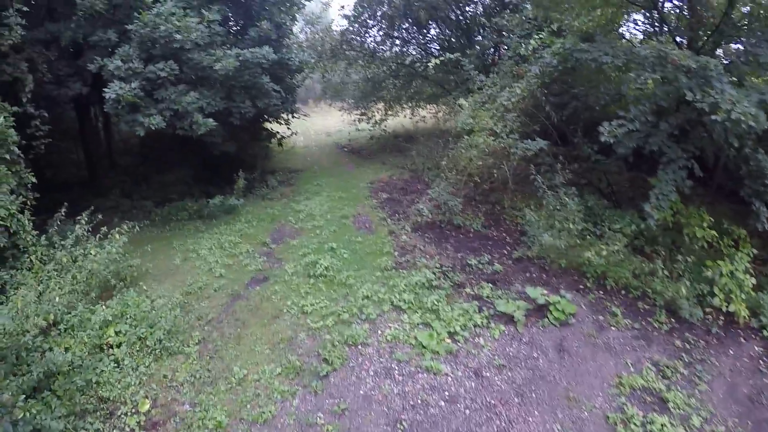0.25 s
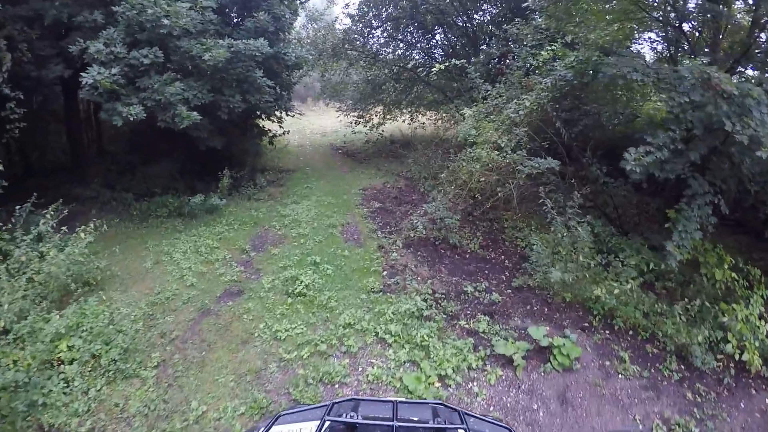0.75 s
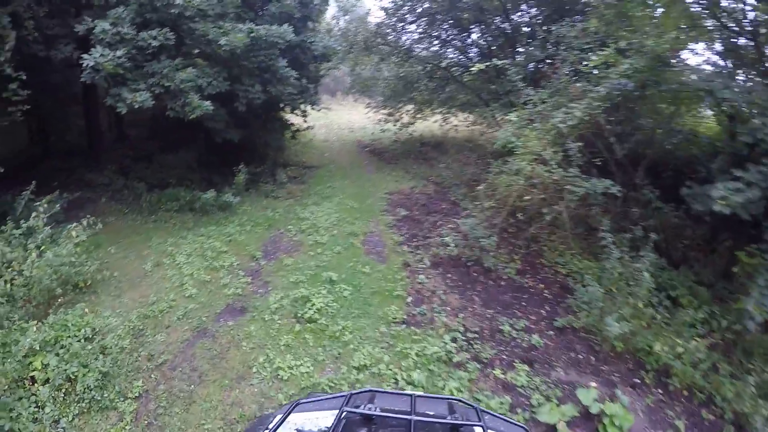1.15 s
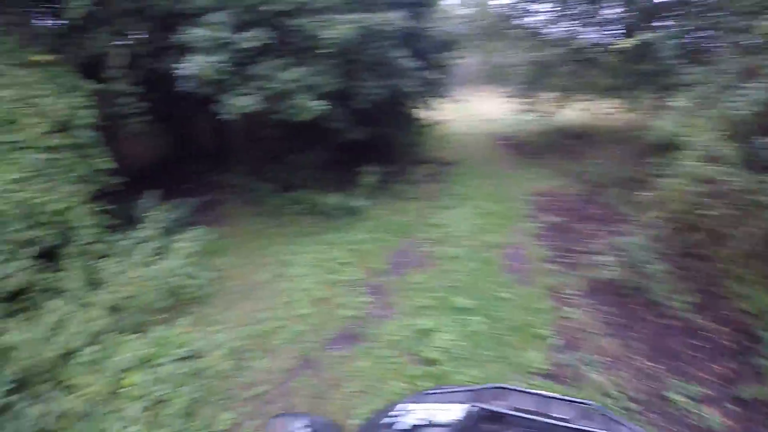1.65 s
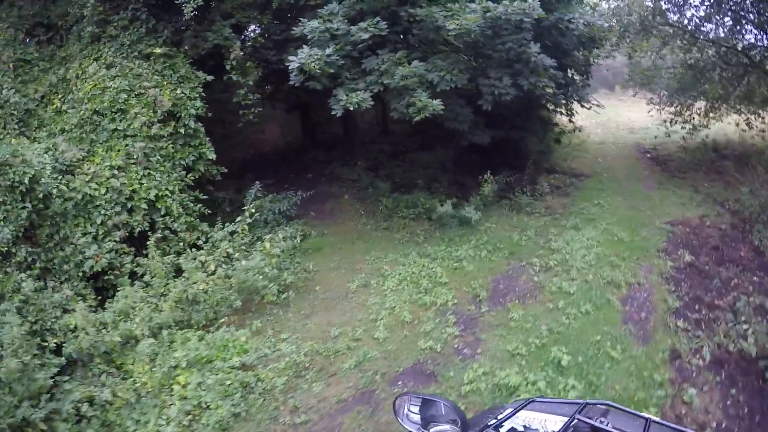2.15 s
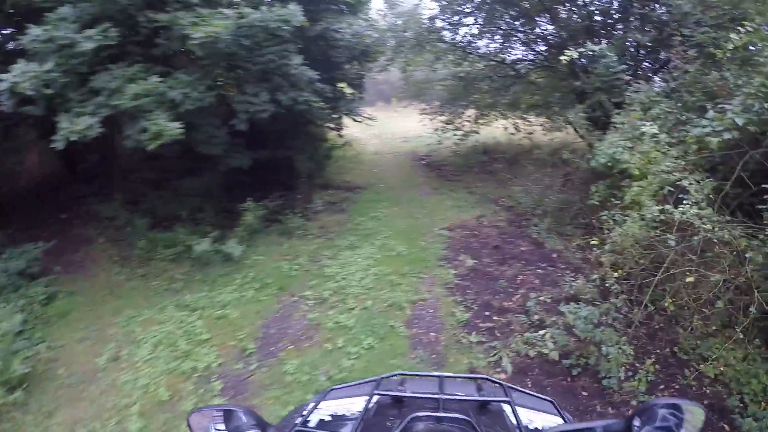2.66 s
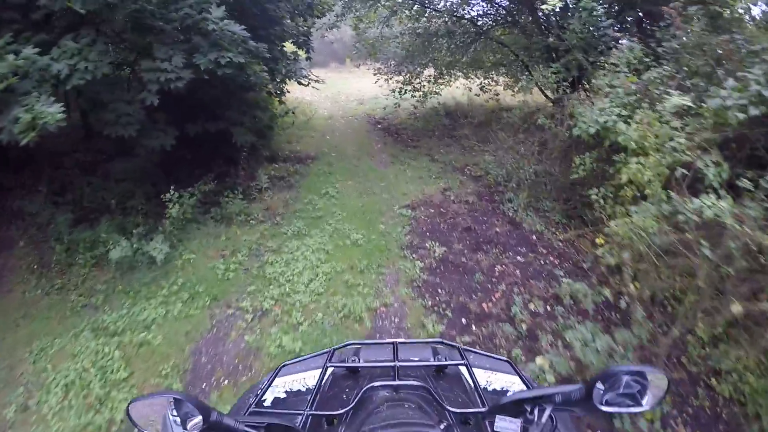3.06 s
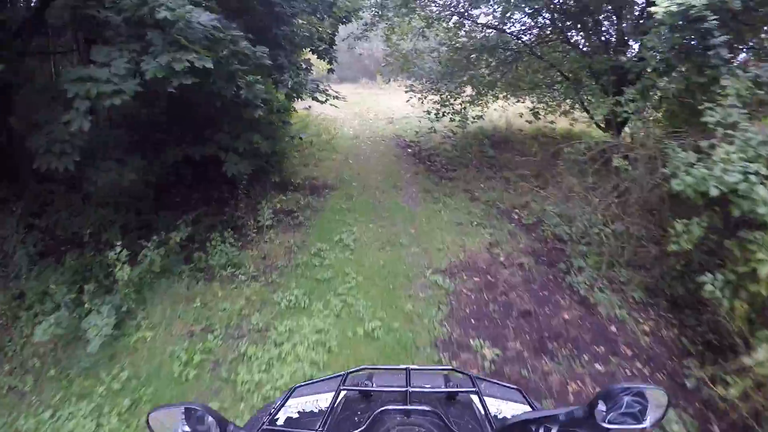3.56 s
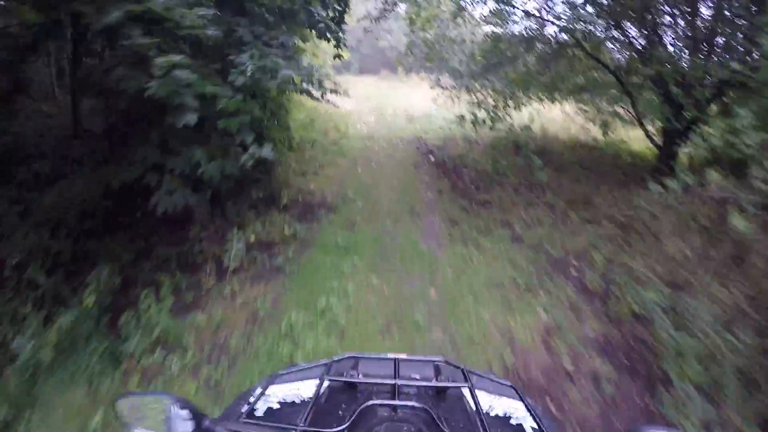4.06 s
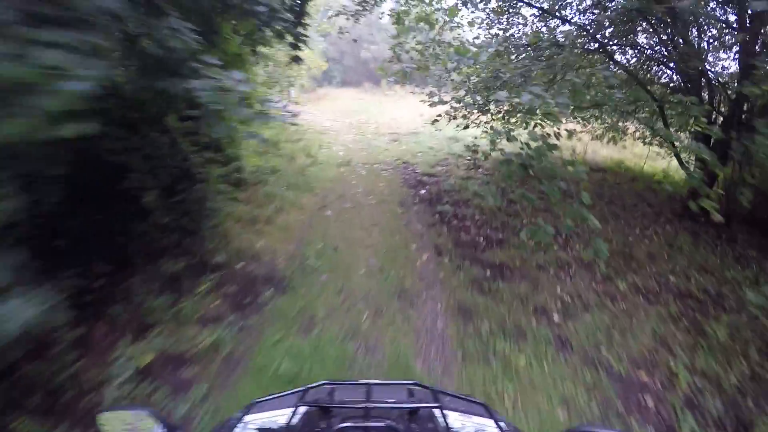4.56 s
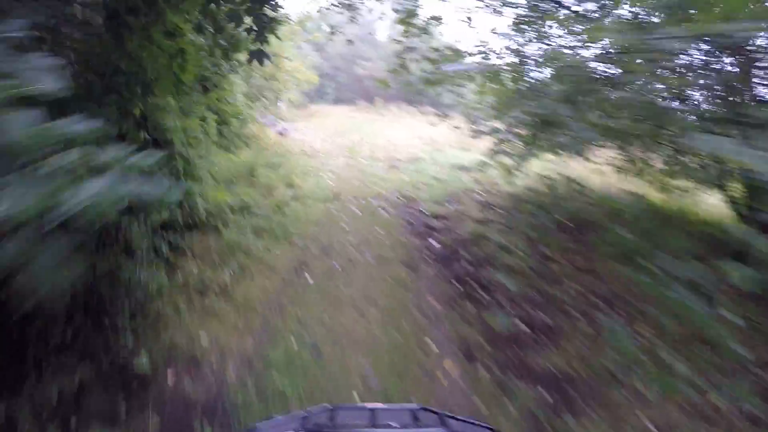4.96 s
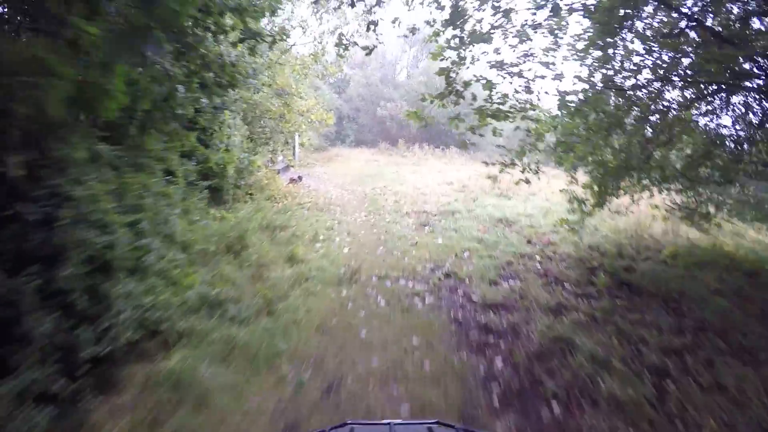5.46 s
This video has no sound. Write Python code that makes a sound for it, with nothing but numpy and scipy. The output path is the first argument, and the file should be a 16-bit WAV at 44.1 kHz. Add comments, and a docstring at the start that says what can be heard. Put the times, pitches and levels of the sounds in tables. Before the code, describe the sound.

A rider-worn camera sits close above a single-cylinder quad bike on a muddy, leafy trail. The engine blips at about 0.2-0.6 s with a faint belt chafe and soft low booms, then slows to separate, rounded putts with clear valve tapping, slowest by 2 s. Faint ticks and tiny taps come around 1.6-1.8 s. At 2 s the revs jump and climb until about 3.2 s; the belt chafes again, sinking in pitch, and the putts fuse into a low drone with a rushing rattle and a thin, wavering high whistle. Revs ease slightly near 3.5 s, then rise and hold, with faint tyre rumble. Twig ticks appear at 3.3-3.7 s. A hard plasticky knock lands at 3.86 s, smaller bumps near 4.0, a brief scuff, then the loudest clipped knock at 4.13 s with a deep decaying wobble, and another at 4.28. The steady drone continues to 5.7 s.

```python
"""Quad bike pulling away, from the rider's camera

Muddy trail, one microphone: a camera worn by the rider of a single-cylinder quad bike, right above the engine.
The engine blips, putts at idle, then pulls away: puffs of gas in each cycle ring the silencer and shake the frame.
Valve gear chatters as tap-and-rush noise through casing resonances; belt and transmission sing as narrow noise.
Near four seconds something knocks on the camera housing: its damped modes ring and the mount wobbles.
"""
import sys
import numpy as np
from scipy import signal
from scipy.fft import rfft, irfft
from scipy.io import wavfile
from scipy.ndimage import uniform_filter1d

SR = 44100
rng = np.random.default_rng(int(sys.argv[2]) if len(sys.argv) > 2 else 0)


def int16_out(signal):
    """Quantize to a 16-bit WAV file."""
    q = np.round(np.clip(np.atleast_2d(signal).T, -1, 1) * 32767)
    wavfile.write(sys.argv[1], SR, q.astype(np.int16))


N = 251370
T = np.arange(N) / SR  # s
FREQ = np.fft.rfftfreq(N, 1 / SR) + 1e-3  # Hz, kept off zero for the divisions and logarithms


def undb(db):
    """Decibels to gain."""
    return 10 ** (np.asarray(db) / 20)


def unit(x):
    """Scale to rms 1."""
    return x / np.sqrt(np.mean(x ** 2))


def curves(rows):
    """The columns of a (time, value...) table at every sample."""
    s, *columns = np.transpose(rows)
    return [np.interp(T, s, column) for column in columns]


def filtered(x, response):
    """Pass a signal through a frequency response."""
    return irfft(rfft(x) * response, N)


def colour(points):
    """Response through (frequency [Hz], level [dB]) points."""
    hz, db = np.transpose(points)
    return undb(np.interp(np.log(FREQ), np.log(hz), db))


def resonance(hz, width):
    """Response of one resonance, gain 1 at its centre."""
    return 1 / (1 + 1j * (FREQ / hz - hz / FREQ) * hz / width)


def band(x, low_hz, high_hz, order=2):
    """Causal band-pass."""
    edges = np.clip([low_hz, max(high_hz, 1.1 * low_hz)], 10, .45 * SR)
    sos = signal.butter(order, edges, "band", fs=SR, output="sos")
    return signal.sosfilt(sos, x)


def walk(rate):
    """Random levels held 1 / rate s and smoothed twice, scaled to rms 1."""
    hold = int(SR / rate)
    steps = np.repeat(rng.standard_normal(N // hold + 1), hold)
    smooth = uniform_filter1d(uniform_filter1d(steps, hold), hold)
    return unit(smooth[:N])


def hump(centre_s, length_s):
    """A smooth rise to 1 and back."""
    return np.exp(-(2 * (T - centre_s) / length_s) ** 2)


def add(out, start, sound):
    """Mix a sound in from a given time."""
    i = int(start * SR)
    out[i:i + len(sound)] += sound[:N - i]


def pulses(turns, place, jitter_s, scatter_db):
    """One pulse a cycle at the given place, each a little early or late, strong or weak."""
    cycles = np.arange(1, int(turns[-1]) + 1) + place
    chance = rng.standard_normal((len(cycles), 2))
    at = (np.interp(cycles, turns, T) + jitter_s * chance[:, 0]) * SR
    inside = (at > 1) & (at < N - 200)
    strength = undb(scatter_db * chance[inside, 1])
    return np.bincount(at[inside].astype(int), strength, N)


def sing(hz, width_hz):
    """Friction feeds one narrow, drifting resonance: slow noise on a sine carrier."""
    flutter = filtered(rng.standard_normal(N), 1 / (1 + (2 * FREQ / width_hz) ** 2))
    return unit(flutter * np.sin(2 * np.pi * np.cumsum(hz) / SR))


def ring(modes, t):
    """Sum of decaying sines (frequency [Hz], level [dB], t60 [s]), scaled to rms 1."""
    return unit(sum(undb(db) * np.sin(2 * np.pi * hz * t) * 1000 ** (-t / t60) for hz, db, t60 in modes))


def hiss():
    """Faint steady hiss of leaves and microphone."""
    return undb(-73.5) * unit(band(rng.standard_normal(N), 5000, 18000, order=1))


# Puffs of one cycle, blowdown, piston sweep and intake gulp: (place in the cycle [0-1], relative level [dB])
GAS_PUFFS = [(.0, -7), (0.152, 5), (0.314, -14.5)]
# Silencer and airbox resonances, each used twice in a row:
# (centre [Hz], width of one pass [Hz], relative level extrapolated to load 2 [dB], rise per unit of load [dB])
SILENCER_MODES = [(146.4, 74, -25, -5.5), (174.5, 39.5, 9, 11), (225, 33, -15.5, -1.5),
                  (343, 85, -19.5, 1.5), (457, 103, -20, 5.5)]
# Level at cruising speed and full load, rise per octave of speed, rise from no load to full load
EXHAUST_DB, EXHAUST_OCTAVE_DB, EXHAUST_LOAD_DB = -37.5, 5.5, 4


def exhaust(turns, octaves, load):
    """The puffs of each cycle ring the silencer: separate broad putts at idle, a low drone under way."""
    db = EXHAUST_DB + EXHAUST_OCTAVE_DB * octaves + EXHAUST_LOAD_DB * (load - 1)
    # a four-stroke fires very evenly
    puffs = sum(undb(puff_db) * pulses(turns, place, jitter_s=.00005, scatter_db=.6)
                for place, puff_db in GAS_PUFFS)
    # two chambers in a row, so each putt swells before it fades
    sound = sum(filtered(puffs * undb(mode_db + rise_db * (load - 2)), resonance(f, width) ** 2)
                for f, width, mode_db, rise_db in SILENCER_MODES)
    # the silencer passes little above this band
    sound = band(sound, 80, 562, order=4)
    # the power over two cycles sets the scale, so that the putts keep their shape
    energy = np.cumsum(sound ** 2)
    before, after = (np.interp(turns + k, turns, np.arange(N)).astype(int) for k in (-1, 1))
    power = (energy[after] - energy[before]) / (after - before)
    return sound / np.sqrt(power + 0.0012 * power.mean()) * undb(db)


# Valves closing and piston slap: (place in the cycle [0-1], relative level [dB])
VALVE_TAPS = [(0.138, 8), (0.831, 6.5)]
# Casing and bodywork colour: (frequency [Hz], relative level [dB per Hz])
CASING_COLOUR = [(400, 4.5), (520, -5), (600, -10), (740, -10.5), (1000, -7), (1500, -4), (2200, -3),
                 (2800, -10), (3800, -12.5), (4800, -12), (6500, -18.5), (8000, -21.5), (8800, -27),
                 (11500, -32.5), (15000, -36.5)]
# Casing resonances that stand out of it: (centre [Hz], width [Hz], level against the colour [dB])
CASING_MODES = [(513, 68, 0.5), (1128, 31, -1), (1740, 123, -3.5), (4225, 140, 3.5), (6440, 690, 0.5),
                (7670, 360, -2), (10160, 630, 3.5)]
# Level of the 900-3000 Hz band at cruising speed, rise per octave of speed
GEAR_DB, GEAR_OCTAVE_DB = -49, 9
# Treble share at cruising speed and half load, rise from no load to full load, change per octave of speed
TREBLE_DB, TREBLE_LOAD_DB, TREBLE_OCTAVE_DB = -11, 6, -3.5


def gear(turns, hz, octaves, load):
    """Chain and belt rush that swells once a cycle, with piston and valve taps, all coloured by the casing."""
    # the transmission rattles harder for a moment as the bike pulls
    db = GEAR_DB + GEAR_OCTAVE_DB * octaves + 2.5 * hump(centre_s=3.24, length_s=.88)
    treble_db = TREBLE_DB + TREBLE_OCTAVE_DB * octaves + TREBLE_LOAD_DB * (load - .5)
    cycle_swell_db = np.cos(2 * np.pi * (turns - .41)) * hz / hz.max()
    rush = undb(cycle_swell_db + 0.8 * walk(45)) * rng.standard_normal(N)
    taps = sum(undb(tap_db) * pulses(turns, place, jitter_s=.0005, scatter_db=2)
               for place, tap_db in VALVE_TAPS)
    # each tap buzzes on for a few milliseconds
    tails = signal.lfilter([1], [1, -np.exp(-1 / (0.0048 * SR))], taps)
    buzz = tails * rng.standard_normal(N)
    # taps stand out at idle and sink into the rush at speed
    clatter = unit(band(buzz, 530, 2350, order=1)) * undb(-16.5) * (hz.max() / hz) ** 0.96
    rings = 1 + sum(undb(ring_db) * resonance(f, width) for f, width, ring_db in CASING_MODES)
    hollow = 1 - .75 * resonance(7150, 500)  # a dip in the treble
    sound = filtered(rush + clatter, colour(CASING_COLOUR) * rings * hollow)
    # such small parts radiate no bass
    sound = band(sound, 470, 18000, order=4)
    sound = sound / np.std(band(sound, 900, 3000, order=6))
    # the treble has its own share
    treble = filtered(sound, 1 / (1 + (3800 / FREQ) ** 4))
    lift = undb(treble_db) / np.std(band(sound, 5000, 12000, order=6))
    return undb(db) * (sound + (lift - 1) * treble)


# Low response of the camera mount: (frequency [Hz], relative level [dB per Hz])
MOUNT_COLOUR = [(12, -32), (26, -1), (42, -6.5), (55, -10.5), (80, -12.5), (130, -2), (300, 3), (600, -58)]
# Hum at crank speed, which sinks as the bike pulls away and then returns: (time [s], level [dB])
CRANK_HUM = [(2.2, -41), (3.0, -62), (3.7, -43.5), (4.45, -41), (5.0, -46.5), (5.7, -44)]
# Level at cruising speed, change per octave of speed, random unevenness
SHAKE_DB, SHAKE_OCTAVE_DB, SHAKE_PATCHY_DB = -37.5, -1.5, 1.5
JIGGLE_DB = 4.5  # irregular share of the shake against the engine's throb


def shake(turns, hz, octaves):
    """The engine's lowest orders and the rough trail rock the camera; the crank hums through the frame."""
    db = SHAKE_DB + SHAKE_OCTAVE_DB * octaves + SHAKE_PATCHY_DB * walk(8)
    crank_db, = curves(CRANK_HUM)
    mount = colour(MOUNT_COLOUR)
    throb = sum(np.interp(order * hz, FREQ, mount) * np.cos(2 * np.pi * order * (turns - .22))
                for order in range(1, 8))
    # the soft mount passes only the slowest swings
    throb = filtered(throb, 1 / (1 + (FREQ / 75) ** 6))
    jiggle = band(filtered(rng.standard_normal(N), mount), 14, 66, order=3)
    sway = unit(throb) + undb(JIGGLE_DB) * unit(jiggle)
    # level out the slow changes of strength
    power = uniform_filter1d(uniform_filter1d(sway ** 2, SR // 8), SR // 8)
    sway = sway / np.sqrt(power)
    # the crank turns twice for each firing
    crank = np.sqrt(2) * np.sin(4 * np.pi * turns)
    return sway * undb(db) + crank * undb(crank_db)


# The drive belt chafes as the clutch takes it up: (time [s], hold [s], level [dB], fade [dB per s])
BELT_CHAFES = [(.05, 0.58, -57, 118), (2.132, 1, -56, 1.5)]
CHAFE_ATTACK_S, CHAFE_START_HZ, CHAFE_END_HZ, CHAFE_SETTLE_S = 0.14, 2013, 1698, .4


def belt():
    """Each time the clutch bites the belt chafes: it swells, sinks in pitch as it grips, holds and fades."""
    out = np.zeros(N)
    for start, hold_s, db, fade_db in BELT_CHAFES:
        age = np.maximum(T - start, 0)
        hz = CHAFE_END_HZ + (CHAFE_START_HZ - CHAFE_END_HZ) * np.exp(-age / CHAFE_SETTLE_S)
        swell = np.minimum(age / CHAFE_ATTACK_S, 1)
        fade = undb(db - fade_db * np.maximum(age - hold_s, 0))
        out += swell * fade * sing(hz, width_hz=140)
    return out


# Brief low booms as the engine's vibration sets the camera mount swaying:
# (time of the middle [s], length [s], level [dB], frequency [Hz])
MOUNT_SWELLS = [(0.341, 0.15, -28.5, 44), (0.702, 0.12, -32, 42), (0.999, 0.28, -32, 29.9),
                (2.09, 0.11, -31.5, 40.5), (2.329, 0.16, -26, 45.7), (3.117, 0.062, -28, 29.8),
                (3.425, 0.17, -30.5, 31.7)]


def mount_swells():
    """A soft low swell of a few cycles: a sine under a smooth hump."""
    out = np.zeros(N)
    for middle, length_s, db, hz in MOUNT_SWELLS:
        swing = np.sqrt(2) * np.sin(2 * np.pi * (hz * (T - middle) + rng.random()))
        out += undb(db) * hump(middle, length_s) * swing
    return out


# Twigs and grit ticking against the machine: (time [s], relative level [dB])
TWIG_TICKS = [(1.554, -63), (1.606, -61), (3.28, -59), (3.292, -50), (3.464, -56), (3.672, -60),
              (3.722, -58)]


def ticks():
    """Tiny bright snaps: noise that dies away within milliseconds."""
    out, t = np.zeros(N), T[:SR // 20]
    for start, db in TWIG_TICKS:
        # the offset sets the level of the noise ahead of the band-pass
        add(out, start, undb(db + 12) * rng.standard_normal(len(t)) * np.exp(-t / 0.0031))
    return band(out, 5000, 10100)


# Knocks on the camera housing, right at the microphone:
# (time [s], level over 10 ms [dB], scrape length [s], low edge [Hz], high edge [Hz], struck spot's pitch [Hz])
HOUSING_KNOCKS = [(1.673, -54.5, 0.00084, 890, 2070, 1440), (1.7005, -47, 0.00064, 920, 2020, 1230),
                  (1.833, -52.5, .001, 890, 2370, 1290), (3.8583, -11, 0.00062, 1170, 3130, 1535),
                  (3.98, -30, 0.0064, 900, 4100, 1700), (4.001, -21.5, 0.0027, 470, 4400, 1020),
                  (4.02, -24.5, 0.0016, 1580, 5730, 2000), (4.1333, -9.5, 0.0013, 252, 3600, 1732),
                  (4.139, -18.5, 0.0045, 165, 3160, 710), (4.275, -23.5, 0.002, 595, 3080, 1870),
                  (4.321, -40, 0.0024, 900, 2500, 1730)]
# Modes of the plastic housing: (frequency [Hz], relative level [dB], t60 [s])
HOUSING_MODES = [(182, 4, 0.11), (347, -8, 0.095), (476, -9, 0.2), (615, 10, 0.018), (830, -12, 0.049),
                 (980, -20, 0.056), (1143, 1.5, 0.039), (1320, -11, 0.0038), (1653, 1, 0.023),
                 (1940, 11, 0.0078), (2160, -13, 0.061), (2306, 4, 0.034), (2600, 3, 0.015),
                 (3010, -7.5, 0.029), (4280, -16, 0.033), (5230, -12, 0.03), (6270, 4, 0.021),
                 (7400, -30, 0.013)]
RING_DB, SPOT_DB = 5, 3.5  # ring of the housing and of the struck spot, before softening
SOFTEN_DB, HARD_S = 6.5, 0.0011  # loss of ring per doubling of scrape length beyond a hard knock's
SPOT_RATIO, SPOT_T60_S = 1.55, 0.028  # the struck spot's two equal modes: pitch ratio, decay


def knocks():
    """Each knock is a sharp push that rings the housing and the struck spot, with a ragged short scrape."""
    out, t = np.zeros(N), T[:SR // 6]
    body = ring(HOUSING_MODES, t)
    for start, db, length_s, low_hz, high_hz, spot_hz in HOUSING_KNOCKS:
        grit = rng.standard_normal(len(t)) * t * np.exp(-t / length_s)
        rung_grit = signal.fftconvolve(grit, body)[:len(t)]
        scrape = unit(band(grit, 510, 1870, order=1)) + undb(4.5) * unit(rung_grit)
        spot = ring([(spot_hz, 0, SPOT_T60_S), (SPOT_RATIO * spot_hz, 0, SPOT_T60_S)], t)
        # a long scrape is a soft contact, which rings less
        hardness = undb(-SOFTEN_DB * np.log2(max(length_s / HARD_S, 1)))
        ringing = hardness * (undb(RING_DB) * body + undb(SPOT_DB) * spot)
        sound = band(ringing + scrape, low_hz, high_hz, order=3)
        # the level is that of its energy spread over ten milliseconds
        add(out, start, undb(db) * sound / np.linalg.norm(sound) * np.sqrt(0.01 * SR))
    return out


# Pitch, level at full load, rise from no load to full load
WHISTLE_HZ, WHISTLE_DB, WHISTLE_LOAD_DB = 7790, -64.5, 28


def whistle(load):
    """The transmission whistles thinly under load, wavering in pitch and strength."""
    db = WHISTLE_DB + WHISTLE_LOAD_DB * (load - 1) + 2 * walk(4.42)
    return undb(db) * sing(WHISTLE_HZ + 30 * walk(2.7), width_hz=150)


# Start, time to reach full level, level
ROLL_S, ROLL_RISE_S, ROLL_DB = 3.6, 0.79, -59.5


def tyres():
    """Uneven rumble of the tread on mud and grass once the bike is rolling."""
    rolling = np.clip((T - ROLL_S) / ROLL_RISE_S, 0, 1)
    rumble = unit(band(rng.standard_normal(N), 486, 810))
    return rolling * undb(ROLL_DB + 2 * walk(27)) * rumble


# Jolts that set the mount wobbling: (time [s], starting amplitude [dB], frequency [Hz], t60 [s])
MOUNT_JOLTS = [(3.868, -9, 44.23, 0.94), (4.127, -2, 42.66, 0.46), (4.306, -11, 40.2, 0.28)]


def wobble():
    """A jolt swings the camera on its springy mount: a decaying low sine."""
    out, t = np.zeros(N), T[:SR]
    for start, db, hz, t60 in MOUNT_JOLTS:
        add(out, start, -undb(db) * np.sin(2 * np.pi * hz * t) * np.exp(-np.log(1000) * t / t60))
    return out


def rub():
    """An uneven scuff of band-limited noise on the housing, just before the loudest knock."""
    scuff = unit(band(rng.standard_normal(N), 1000, 2650, order=3)) * undb(4 * walk(120))
    return undb(-40) * hump(centre_s=4.1, length_s=.086) * scuff


# Engine speed: (time [s], firings per second [Hz])
ENGINE_SPEED = [(0.0, 16.72), (0.09, 16.67), (0.21, 23.41), (0.42, 25.44), (0.58, 24.07), (0.73, 17.93),
                (1.02, 14.66), (1.35, 13.24), (2.0, 12.22), (2.1, 20.14), (2.32, 25.0), (3.0, 30.24),
                (3.22, 30.96), (3.52, 28.32), (3.88, 32.26), (4.68, 32.32), (4.92, 33.54), (5.7, 31.57)]
# Pull of the engine against the trail: (time [s], load [0-1])
ENGINE_LOAD = [(0, 0), (.4, 0.16), (.8, 0.18), (1.9, 0), (2.3, 0.03), (2.7, 0.8), (3.1, 0.87), (3.6, 0.92),
               (5.7, 0.81)]
CRUISE_HZ, START_TURN = 30, .11  # cruising firing rate; place in the cycle at the start


def scene():
    """Engine, trail and knocks at the one microphone; speed and load drive the machine's parts."""
    hz, = curves(ENGINE_SPEED)
    load, = curves(ENGINE_LOAD)
    turns = START_TURN + np.cumsum(hz) / SR  # engine cycles, one firing each
    octaves = np.log2(hz / CRUISE_HZ)
    engine = exhaust(turns, octaves, load) + gear(turns, hz, octaves, load) + belt() + whistle(load)
    camera = shake(turns, hz, octaves) + mount_swells() + knocks() + wobble() + rub()
    return (hiss() + engine + camera + ticks() + tyres())[None]


TOP_HZ = 15300


def record(dry):
    """The camera's microphone clips flat where it is overloaded and cuts the top of the treble."""
    clipped = np.clip(dry, -.95, .95)
    top_cut = signal.ellip(10, .2, 80, TOP_HZ, fs=SR, output="sos")
    return signal.sosfilt(top_cut, clipped)


dry = scene()
out = record(dry)
int16_out(out)
```